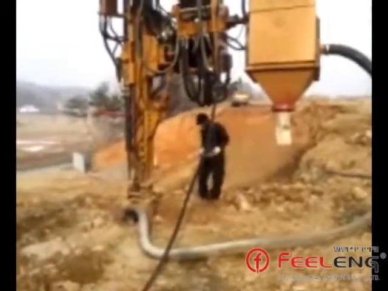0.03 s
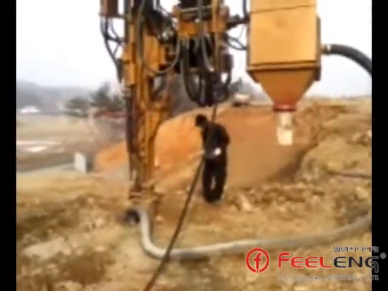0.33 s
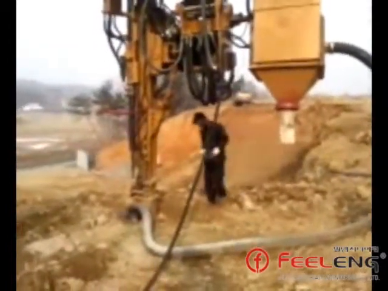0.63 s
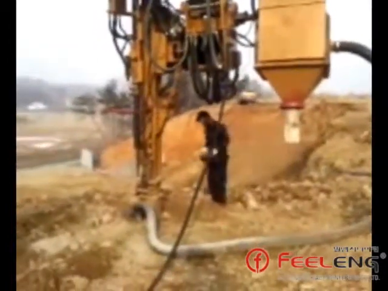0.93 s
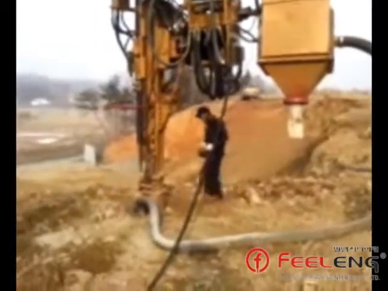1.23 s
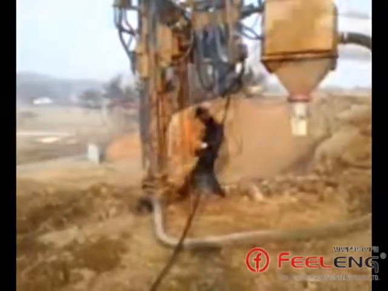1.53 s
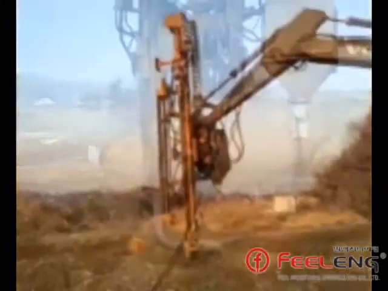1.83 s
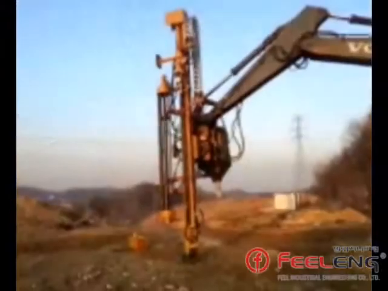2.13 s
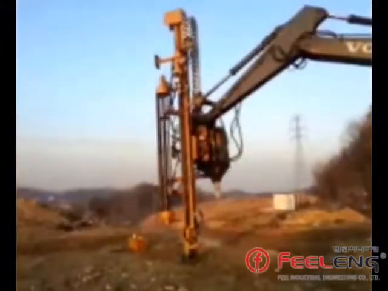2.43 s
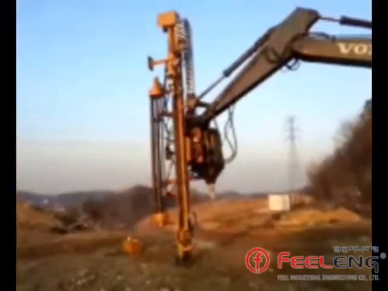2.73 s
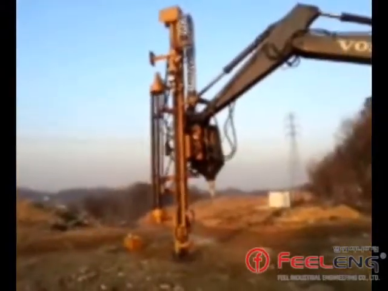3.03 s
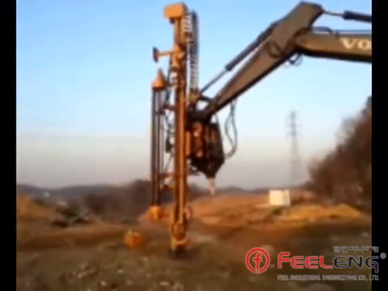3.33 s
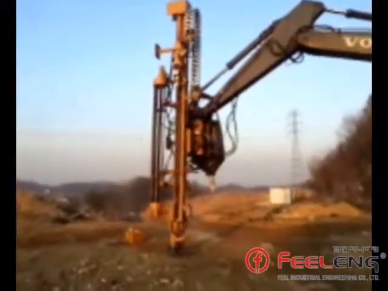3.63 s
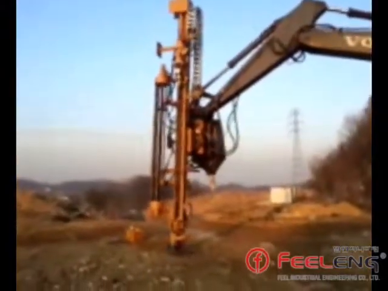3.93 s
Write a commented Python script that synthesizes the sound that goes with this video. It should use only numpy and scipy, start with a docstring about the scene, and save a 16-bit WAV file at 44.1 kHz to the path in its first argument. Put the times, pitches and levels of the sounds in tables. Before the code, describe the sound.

A rock drill hammers very fast from the start, close enough to distort, its steel rod ringing and squealing over roaring air and a low throb. Between about 1.5 and 2.4 seconds it fades into a much quieter, steady diesel engine. A hydraulic pump whine over the engine eases off from about 2.6 seconds. One soft, dull knock comes near 3.8 seconds.

```python
"""A rock drill hammers its steel rod about 25 times a second, close enough to overload the microphone.
The blows crack, the rod rings and squeals, flushing air and grit roar, the power pack throbs below.
From about 1.5 s this fades into a second rig standing by: a six-cylinder diesel whose hydraulic
pump whine eases off. One dull knock comes near the end."""
import sys
import numpy as np
from scipy import signal
from scipy.fft import rfft, irfft
from scipy.io import wavfile

SR = 44100
rng = np.random.default_rng(int(sys.argv[2]) if len(sys.argv) > 2 else 0)


def wav_record(signal):
    """Record a signal, one row per channel, as 16-bit PCM in the file named by sys.argv[1]."""
    frames = np.transpose(np.atleast_2d(signal))
    bounded = np.clip(frames, -1, 1)
    # unit amplitude maps onto the largest positive 16-bit level
    quanta = np.round(bounded * 32767).astype(np.int16)
    wavfile.write(sys.argv[1], SR, quanta)


N = 176400
T = np.arange(N) / SR
HZ = np.fft.rfftfreq(N, 1 / SR)


def amp(db):
    """Decibels to gain."""
    return 10 ** (np.asarray(db) / 20)


def unit(x):
    """Scale to rms 1."""
    return x / np.sqrt(np.mean(x ** 2) + 1e-20)


def curve(rows):
    """Straight lines through (seconds, value) rows."""
    return np.interp(T, *np.transpose(rows))


def noise(gain):
    """Noise of rms 1, shaped by a gain per frequency."""
    return unit(irfft(rfft(rng.standard_normal(N)) * gain, N))


def coloured(points):
    """Noise with a spectral shape of (Hz, dB) points."""
    hz, db = np.transpose(points)
    return noise(amp(np.interp(np.log(HZ + 1), np.log(hz), db)))


def ringing(hz, width_hz):
    """Noise in one resonance."""
    return noise(1 / (1 + ((HZ - hz) / (.75 * width_hz)) ** 2))


def drift(rate_hz):
    """Slow random wander of rms 1."""
    coarse_s = T[::100]
    hz = np.fft.rfftfreq(len(coarse_s), coarse_s[1])
    spectrum = rfft(rng.standard_normal(len(coarse_s))) / (1 + (hz / rate_hz) ** 4)
    return unit(np.interp(T, coarse_s, irfft(spectrum, len(coarse_s))))


def tone(cycles, waver_db, waver_rad, rate_hz):
    """Sine of rms near 1, wavering in level and phase."""
    gain = np.sqrt(2) * amp(waver_db * drift(rate_hz))
    return gain * np.sin(2 * np.pi * (cycles + rng.random()) + waver_rad * drift(rate_hz))


def lowpass(x, hz):
    """Steep low-pass."""
    return signal.oaconvolve(x, signal.firwin(601, hz, window=("kaiser", 9), fs=SR), "same")


def swell(t, rise_s, decay_s):
    """Exponential rise and decay, zero before t = 0."""
    t = np.maximum(t, 0)
    return (1 - np.exp(-t / rise_s)) * np.exp(-t / decay_s)


def after(blows, delay_s, rise_s, decay_s):
    """Envelope of rms 1 with a swell after every blow."""
    return unit(signal.oaconvolve(blows, swell(T[:SR // 5] - delay_s, rise_s, decay_s))[:N])


# Firing note. Each row: time in seconds, level in dB.
FIRING_DB = [(1.5, -17), (2.2, -25.5), (2.58, -26.5), (2.83, -21.5), (3.2, -22.5), (3.65, -22), (4, -21.5)]
# Other engine, fan and gear tones. Each entry: multiple of the firing rate.
ENGINE_ORDERS = [1.745, 2, 8 / 3, 10 / 3, 4, 13 / 3, 16 / 3, 6, 9, 14.38, 16.15]
# Each entry: level of the matching tone in dB.
ENGINE_ORDER_DB = [-28, -40.5, -53, -44.5, -49, -50, -49, -37, -47, -51, -53.5]


def engine_tones(firings):
    """Firing note, fan and gear tones, locked to engine speed."""
    note = amp(curve(FIRING_DB)) * tone(firings, waver_db=-1, waver_rad=.04, rate_hz=3.6)
    return note + sum(amp(db) * tone(order * firings, waver_db=1.5, waver_rad=.051, rate_hz=6.5)
                      for order, db in zip(ENGINE_ORDERS, ENGINE_ORDER_DB))


# Pump whine. Each row: time in seconds, level in dB.
PUMP_DB = [(1.72, -22), (2.1, -25), (2.55, -26.5), (2.85, -33.5), (3.05, -35.5), (3.4, -43), (4, -47)]
# Valve resonances. Each row: centre in Hz, width in Hz, level in dB relative to the whine.
VALVES = [(1097, 3.6, -22), (1040, 190, -24), (2200, 660, -32), (3220, 220, -19.5), (4015, 12, -23),
          (4480, 160, -21)]


def hydraulic_pump(firings):
    """The loaded pump whines at three times the firing rate; oil rushes and whistles through valves."""
    whine = tone(3 * firings, waver_db=-.56, waver_rad=.13, rate_hz=11)
    oil = sum(amp(db) * ringing(hz, width_hz) for hz, width_hz, db in VALVES)
    return amp(curve(PUMP_DB)) * (whine + oil)


# Engine noise. Each row: frequency in Hz, relative density in dB.
RUMBLE_SPECTRUM = [(15, -11), (40, -2), (110, 0.5), (190, -6), (300, -7.5), (420, -9.5), (560, -15),
                   (900, -16.5), (1150, -22), (1500, -19.5), (2500, -24), (4000, -21.5), (6000, -20.5),
                   (7200, -23.5), (10000, -24.5), (11800, -27)]


def rumble(firings):
    """Engine rumble and hiss, pulsing slightly with the crankshaft."""
    shake = .047 * np.cos(2 * np.pi * firings * 2 / 3)
    stroke = .08 * np.cos(2 * np.pi * firings * 3)
    return amp(-30.5 + .5 * drift(rate_hz=22)) * coloured(RUMBLE_SPECTRUM) * (1 + shake + stroke)


# Panel and pipe resonances. Each row: centre in Hz, width in Hz, level in dB.
PANELS = [(1133, 120, -49), (1820, 160, -52), (3690, 28, -53), (4680, 30, -51.5), (5850, 75, -49),
          (6300, 120, -55)]


def panel_clatter(firings):
    """Engine panels and pipes ring, pulsing unevenly at the firing rate."""
    pulse = unit(amp(1.7 * np.cos(2 * np.pi * firings) + 2.5 * drift(rate_hz=31)))
    return pulse * sum(amp(db) * ringing(hz, width_hz) for hz, width_hz, db in PANELS)


# Diesel speed. Each row: time in seconds, firing rate in Hz.
FIRING_HZ = [(1.5, 74.57), (2.0, 75.2), (2.52, 74.5), (2.72, 72.95), (2.92, 71.7), (3.15, 73.4),
             (3.5, 72.94), (4, 73.93)]


def diesel():
    """One engine speed drives tones, pump, rumble and clatter."""
    firings = np.cumsum(curve(FIRING_HZ)) / SR
    return engine_tones(firings) + hydraulic_pump(firings) + rumble(firings) + panel_clatter(firings)


def knock(start_s):
    """One soft, dull knock."""
    return amp(-24.5) * swell(T - start_s, rise_s=.0017, decay_s=.017) * ringing(hz=220, width_hz=114)


# Power pack tones. Each entry: multiple of the shaft speed.
PACK_ORDERS = [4, 5, 8.66, 9.63, 15]
# Each entry: level of the matching tone in dB.
PACK_ORDER_DB = [-22.5, -23.5, -36, -39, -35]


def power_pack(shaft_hz=15.68, in_phase_s=.034):
    """Tones tied to the shaft speed beat together into a throb."""
    turns = shaft_hz * (T - in_phase_s)
    out = np.zeros(N)
    for order, db in zip(PACK_ORDERS, PACK_ORDER_DB):
        gain = np.sqrt(2) * amp(db + .5 * drift(rate_hz=5.4))
        out += gain * np.cos(2 * np.pi * order * turns + .057 * drift(rate_hz=3.5))
    return out


# Air and grit. Each row: frequency in Hz, relative density in dB.
AIR_SPECTRUM = [(20, -15), (60, 5), (130, -1.5), (330, -2), (420, -3.5), (700, -2), (1150, -3), (1950, -4),
                (2600, -1.5), (4500, -4.5), (7500, -1), (9500, -7.5), (11800, -15), (13000, -32)]


def flushing_air(blows, steady_db=-20, spurt_db=-17):
    """Air and grit roar steadily and spurt with each blow."""
    flow = amp(steady_db) + amp(spurt_db) * after(blows, delay_s=.002, rise_s=.0057, decay_s=.011)
    return flow * amp(.77 * drift(rate_hz=8.1)) * coloured(AIR_SPECTRUM)


# Noise bands of a blow. Each row: centre and width in Hz, delay, rise and decay in seconds, level in dB.
CRACK_BANDS = [(8070, 910, 0.00043, 0.004, 0.013, -21), (9700, 3300, .001, .002, 0.048, -25.5),
               (3240, 2200, 0.00042, 0.00045, 0.015, -24.5), (4840, 1740, 0.0046, 0.0032, 0.02, -19),
               (1000, 670, .026, 0.0043, 0.0071, -28.5), (335, 61, 0.0216, 0.0065, 0.014, -31),
               (180, 71, 0.0194, 0.0047, 0.013, -30.5)]


def cracks(blows):
    """Each blow cracks, then rattles the mast."""
    return sum(amp(db) * ringing(hz, width_hz) * after(blows, delay_s, rise_s, decay_s)
               for hz, width_hz, delay_s, rise_s, decay_s, db in CRACK_BANDS)


def struck_mode(blows, hz, decay_s, spread_db=3.5, detune=.00079):
    """One rod mode, rung at a different strength and pitch by each blow of the first 2.5 s."""
    t, out = T[:SR // 6], np.zeros(N + SR)
    envelope = swell(t, rise_s=.006, decay_s=decay_s)
    for at in np.flatnonzero(blows[:SR * 5 // 2]):
        force, pitch, phase = rng.standard_normal(3)
        ring = np.sin(2 * np.pi * (hz * (1 + detune * pitch) * t + phase))
        out[at:at + len(t)] += blows[at] * amp(spread_db * force) * envelope * ring
    return out[:N] / np.sqrt(np.mean(out[:2 * SR] ** 2))


# Lesser rod modes. Each entry: frequency in Hz.
ROD_HZ = [1690, 1760, 2186, 2873, 3287, 3600, 4185, 4752, 5965, 6967, 7620, 7855, 8106, 8270, 8740, 9360,
          11405]
# Each row: decay of the matching mode in seconds, level in dB.
ROD_MODES = [(0.018, -29), (0.013, -29.5), (0.043, -31), (.04, -29.5), (0.038, -31), (0.011, -31),
             (0.027, -28.5), (0.034, -32), (0.0077, -23), (0.015, -30.5), (0.0044, -28.5), (0.023, -28),
             (0.016, -24.5), (0.0083, -23.5), (0.0044, -27.5), (0.016, -26), (0.085, -33.5)]


def rod_ring(blows):
    """The struck steel rod rings in many short-lived modes."""
    return sum(amp(db) * struck_mode(blows, hz, decay_s) for hz, (decay_s, db) in zip(ROD_HZ, ROD_MODES))


# Squealing rod modes, low to high. Each entry: frequency in Hz.
SQUEAL_HZ = [5330, 6610, 7246]
# Each row: width of the matching mode in Hz, gain in dB added to its level curve.
SQUEAL_MODES = [(42, 3.5), (33, 7.5), (32, 4.5)]
# Level curves of the three modes. Each row: time in seconds, level in dB.
LOW_SQUEAL_DB = [(0.0, -23), (0.22, -31), (0.29, -16.5), (0.42, -36), (0.45, -16), (0.54, -21),
                 (0.57, -15.5), (0.62, -25), (0.92, -29), (1.02, -19), (1.14, -22), (1.16, -35),
                 (1.28, -22), (1.33, -38), (1.79, -26), (2.2, -27)]
MIDDLE_SQUEAL_DB = [(0.0, -38), (0.05, -31.5), (0.56, -24.5), (0.61, -23), (0.85, -30), (0.96, -26),
                    (1.02, -30), (1.39, -22.5), (1.41, -17), (1.43, -31), (1.6, -22.5), (1.75, -35),
                    (1.98, -22), (2.2, -26)]
HIGH_SQUEAL_DB = [(0.0, -18), (0.04, -14), (0.43, -29), (0.45, -15), (0.64, -21.5), (0.77, -17.5),
                  (0.8, -32), (0.94, -30), (1.02, -16), (1.17, -33), (1.71, -29), (1.96, -34), (2.01, -20),
                  (2.09, -45), (2.17, -31), (2.2, -42)]


def rod_squeal(blows):
    """Three rod modes take turns to squeal, swelling after each blow."""
    envelope = after(blows, delay_s=.0073, rise_s=.0081, decay_s=.013)
    levels = LOW_SQUEAL_DB, MIDDLE_SQUEAL_DB, HIGH_SQUEAL_DB
    out = np.zeros(N)
    for hz, (width_hz, gain_db), level_db in zip(SQUEAL_HZ, SQUEAL_MODES, levels):
        ring = signal.hilbert(ringing(hz, width_hz))
        steadied = unit(ring.real / (abs(ring) + .01) ** .28)  # partly evens out the level
        out += amp(gain_db + curve(level_db)) * envelope * steadied
    return out


def hammer(rate_hz=25.25, first_s=-.0012, jitter_s=.001, spread_db=1.46):
    """One impulse per piston blow, slightly uneven in time and force."""
    late, force = rng.standard_normal((120, 2)).T
    times_s = first_s + np.arange(len(late)) / rate_hz + jitter_s * late
    at = np.round(times_s * SR).astype(int).clip(0)
    return np.bincount(at[at < N], amp(spread_db * force)[at < N], N)


def rock_drill(drive_db=20.5, ceiling_db=-11):
    """The drill overloads the microphone, which squashes the power pack's throb at every blow."""
    blows = hammer()
    pressure = flushing_air(blows) + power_pack() + cracks(blows) + rod_ring(blows) + rod_squeal(blows)
    return amp(ceiling_db) * np.tanh(amp(drive_db) * pressure)


TREBLE_EDGE_HZ = 11850


def fade_rad(start_s, end_s):
    """Angle ramp from 0 to pi / 2."""
    return np.pi / 2 * np.clip((T - start_s) / (end_s - start_s), 0, 1)


def scene():
    """The drill fades out while the waiting rig fades in."""
    drill = rock_drill()
    waiting_rig = lowpass(diesel() + knock(start_s=3.765), TREBLE_EDGE_HZ)
    fade_out = np.cos(fade_rad(start_s=1.483, end_s=2.359))
    fade_in = np.sin(fade_rad(start_s=1.5, end_s=2.47))
    return (fade_out * drill + fade_in * waiting_rig)[None]


def record(dry):
    """The treble steps down 16 dB above its edge and ends at 15.6 kHz."""
    body = lowpass(dry[0], TREBLE_EDGE_HZ)
    top = dry[0] - body
    return lowpass(body + amp(-16) * top, hz=15600)[None]


dry = scene()
out = record(dry)
wav_record(out)
```